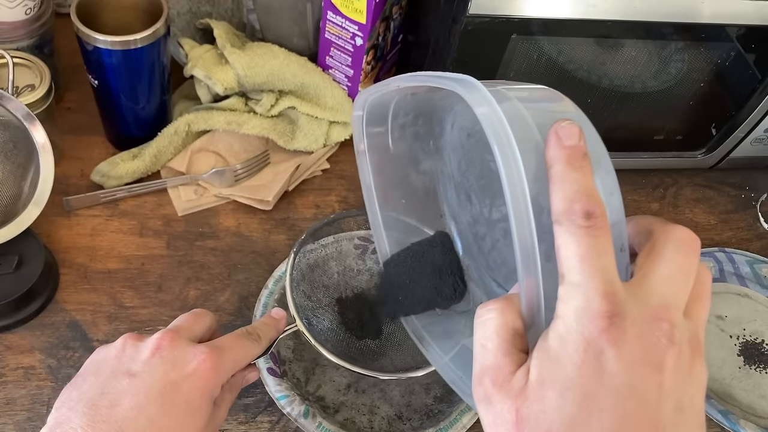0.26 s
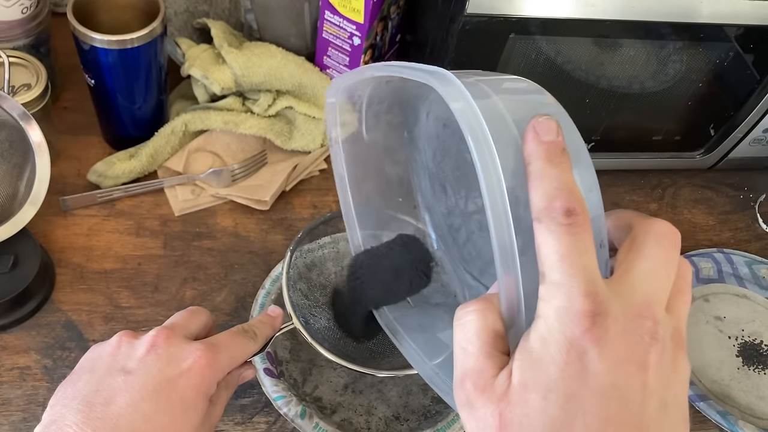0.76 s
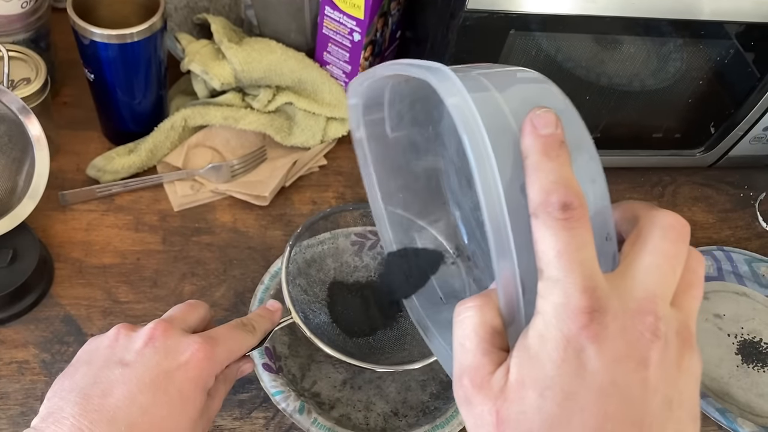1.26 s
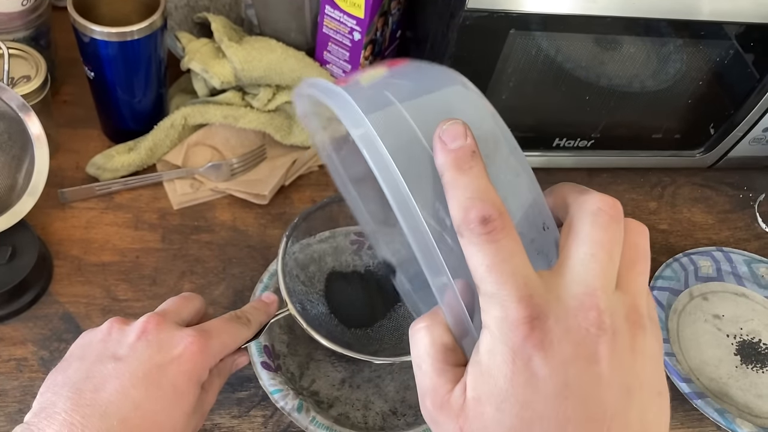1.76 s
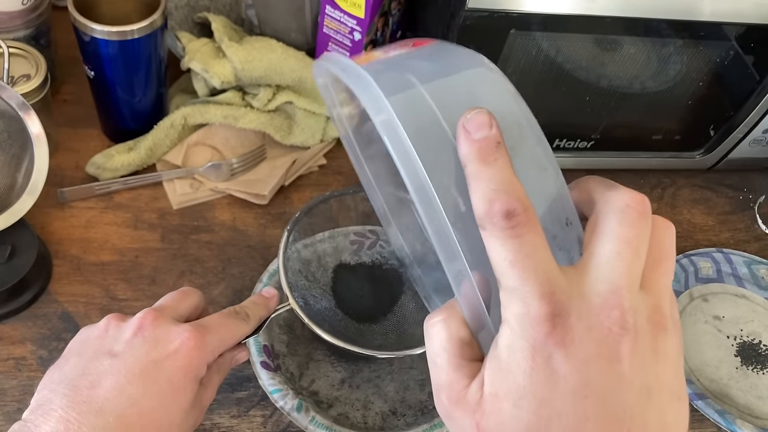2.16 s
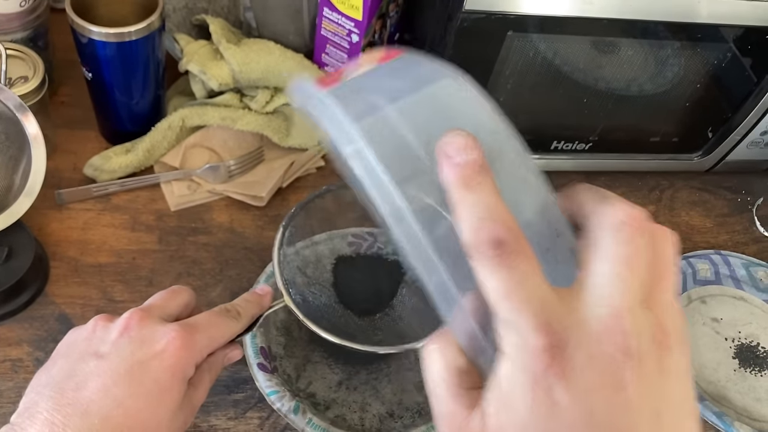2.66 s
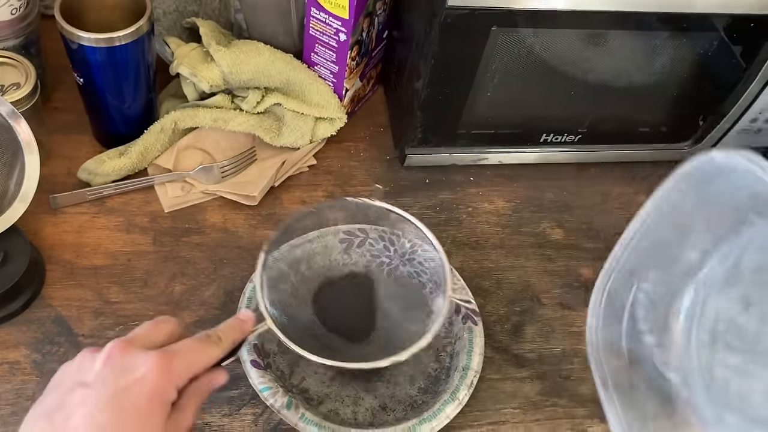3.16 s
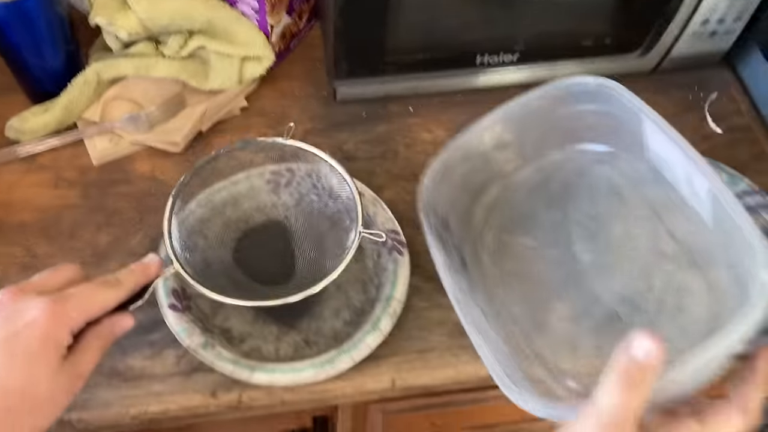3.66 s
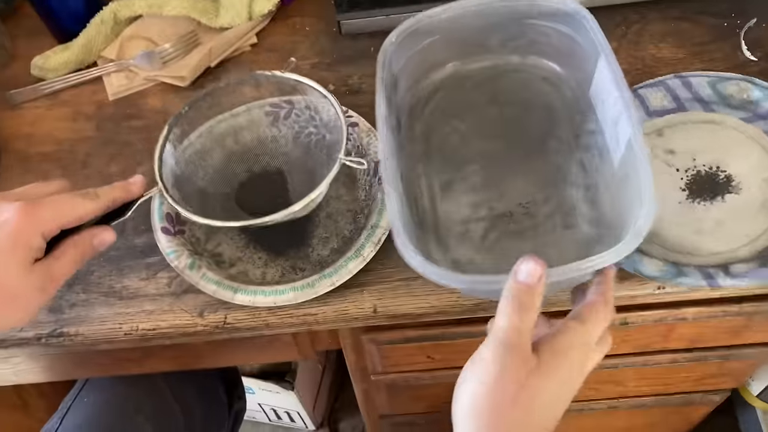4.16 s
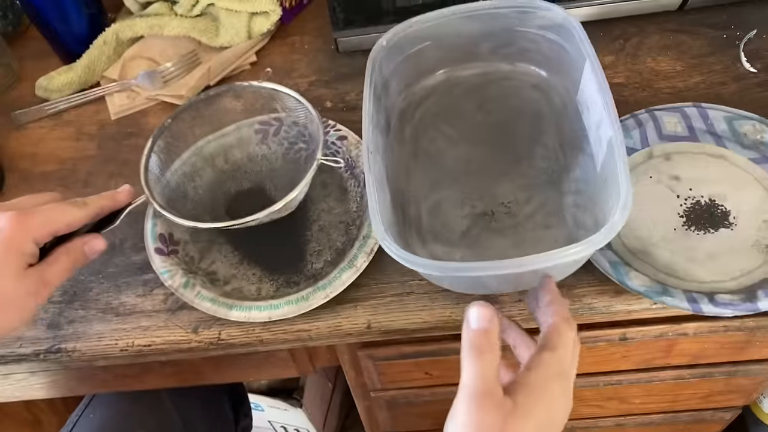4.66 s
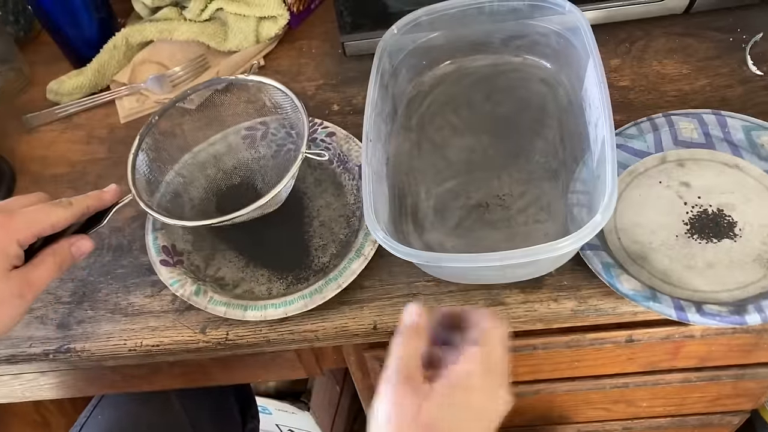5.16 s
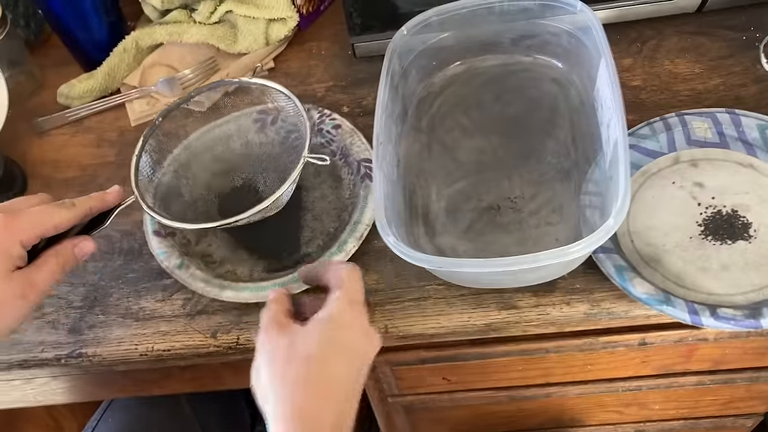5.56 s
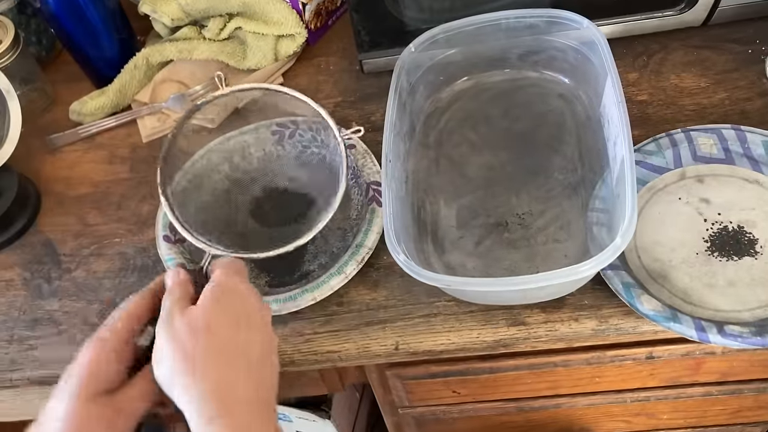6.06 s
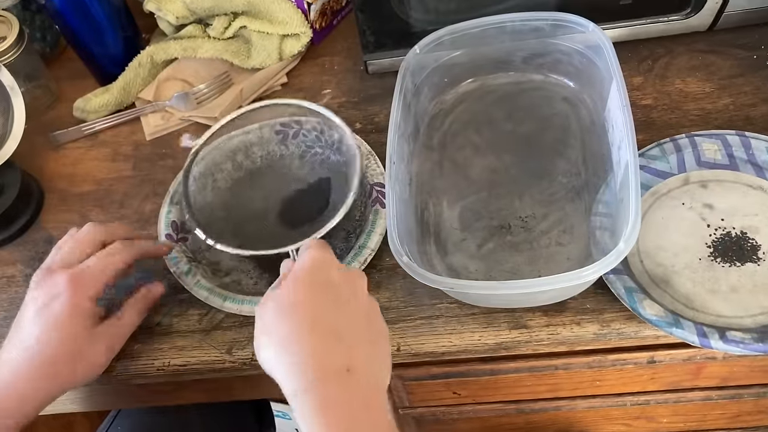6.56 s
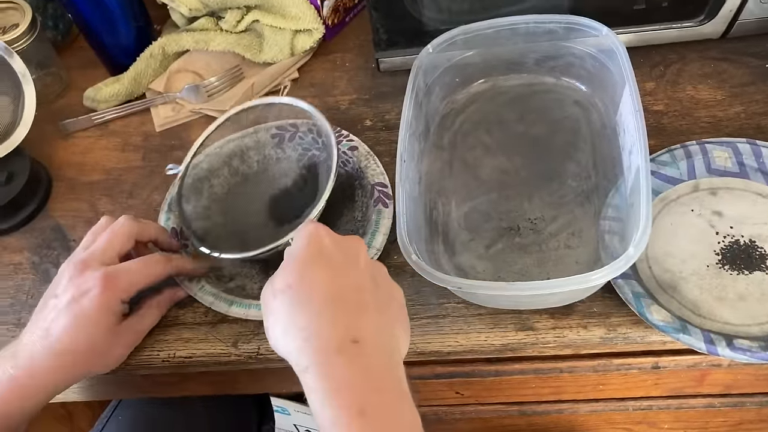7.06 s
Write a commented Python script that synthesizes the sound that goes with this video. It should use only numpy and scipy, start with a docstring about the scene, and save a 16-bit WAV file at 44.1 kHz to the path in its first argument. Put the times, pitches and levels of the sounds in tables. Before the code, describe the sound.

Close up in a small kitchen, fine dry grains slide down a plastic tub and hiss onto wire mesh. Hollow plastic knocks shake out the last grains, then the tub thuds onto a wooden counter and scrapes aside with sharp taps. After a quieter spell, the wire strainer clicks and is shaken in quick, swishing strokes. A distant engine and appliance hum run underneath.

```python
"""Dry grains poured into a wire strainer

Fine grains run from a plastic tub into a wire-mesh strainer on a kitchen counter, close to two microphone ports.
Random tiny impacts make hiss and ticks in the mesh; decaying modes and noise make the tub's knocks, scrapes and taps.
A strainer shake is a row of throws. Outside, an engine changes speed (sine harmonics) beside a fainter drone.
An appliance hums in wavering sines over coloured-noise room air; dense reflections make the small room."""
import sys
import numpy as np
from scipy import signal
from scipy.fft import rfft, irfft
from scipy.io import wavfile
from scipy.ndimage import uniform_filter1d

SR = 44100
rng = np.random.default_rng(int(sys.argv[2]) if len(sys.argv) > 2 else 0)


def bounce(signal):
    """Save signal as a 16-bit WAV file at the path given by the first command-line argument."""
    frames = np.transpose(np.atleast_2d(signal))
    limited = np.clip(frames, -1, 1)
    pcm = np.round(limited * 32767).astype(np.int16)
    wavfile.write(sys.argv[1], SR, pcm)


N = 322371
T = np.arange(N) / SR
HZ = np.fft.rfftfreq(N, 1 / SR)

# Strokes of tub and hands rubbing on the counter. Each row: start in seconds, length in seconds, level in dB.
RUBS = [(3.871, 0.1, -56.5), (4.032, 0.046, -46), (4.103, 0.036, -42.5), (4.155, 0.033, -42.5),
        (4.224, 0.041, -49.5), (4.61, 0.27, -53), (4.67, 0.094, -55.5), (4.775, 0.016, -48.5),
        (4.812, 0.037, -50.5), (5.386, 0.06, -52.5), (5.548, 0.042, -55), (6.138, 0.04, -51),
        (7.049, 0.029, -52)]
RUB_ATTACK_S, RUB_T60_S = 0.0026, 0.065
# Spectrum of rattling grains and snaps on the tub. Each row: frequency in Hz, relative density in dB per Hz.
RATTLE = [(800, -6), (2200, -2.5), (3500, -2.5), (5200, -7.5), (7500, 2.5), (10500, 2), (13000, -6),
          (16000, -11)]


def undb(db):
    """Decibels to gain."""
    return 10 ** (np.asarray(db) / 20)


def unit(x):
    """Scale to rms 1."""
    return x / np.sqrt(np.mean(x ** 2))


def unit_energy(x):
    """Scale to energy 1."""
    return x / np.linalg.norm(x)


def curves(rows):
    """Each column of a table, joined by straight lines in time."""
    s, *columns = np.transpose(rows)
    return [np.interp(T, s, column) for column in columns]


def stroke(rows, fade_s=0.1):
    """Gain of a level curve, faded linearly to silence outside its span."""
    inside_s = np.minimum(T - rows[0][0], rows[-1][0] - T)
    return undb(curves(rows)[0]) * np.clip(1 + inside_s / fade_s, 0, 1)


def walk(rate_hz):
    """Slow random curve, spread near 1: stepped noise smoothed twice."""
    k = int(SR / rate_hz)
    steps = np.repeat(rng.standard_normal(N // k + 1), k)
    return 1.4 * uniform_filter1d(uniform_filter1d(steps, k), k)[:N]


def colour(x, points, size=1024):
    """Minimum-phase filter of unit energy with the given spectrum."""
    hz, db = np.transpose(points)
    grid_hz = np.maximum(np.fft.rfftfreq(size, 1 / SR), 1)
    cepstrum = irfft(np.log(undb(np.interp(np.log(grid_hz), np.log(hz), db))))
    # folding the cepstrum makes the filter causal
    cepstrum[1:size // 2] *= 2
    cepstrum[size // 2 + 1:] = 0
    response = irfft(np.exp(rfft(cepstrum)))
    return signal.oaconvolve(x, unit_energy(response))[:N]


def fade_out(t, t60_s):
    """Exponential decay, 60 dB in t60_s."""
    return np.exp(-np.log(1000) * t / t60_s)


def add(track, s, sound):
    """Mix a sound into a track at s seconds."""
    i = max(int(s * SR), 0)
    track[i:i + len(sound)] += sound[:max(N - i, 0)]


def grains(rate_per_s, spread_db):
    """Random tiny impacts of uneven size and either sign; rms 1."""
    hit = rng.random(N) < rate_per_s / SR
    sign = rng.choice([-1, 1], N)
    size_db = spread_db * np.clip(rng.standard_normal(N), -2.5, 2.5)
    return unit(hit * sign * undb(size_db))


def bursts(times_s, levels_db, hold_s, t60_s, tail_db, tail_t60_s):
    """Envelope of blows: a short held contact, a quick release, then a slower tail."""
    t, envelope = T[:SR // 2], np.zeros(N)
    release = fade_out(np.maximum(t - hold_s, 0), t60_s)
    tail = undb(tail_db) * fade_out(t, tail_t60_s)
    for s, db in zip(times_s, levels_db):
        add(envelope, s, undb(db) * (release + tail))
    blur_s = 0.002  # each side of a landing's edge
    window = np.hanning(max(int(2 * blur_s * SR), 3))
    return signal.oaconvolve(envelope, window / window.sum(), mode="same")


def moves(rows, attack_s, t60_s):
    """Envelope of movements: swell, hold, die away; overlapping ones add in power."""
    t, power = T[:SR], np.zeros(N)
    for s, length_s, db in rows:
        swell = np.minimum(t / attack_s, 1)
        add(power, s, (undb(db) * swell * fade_out(np.maximum(t - length_s, 0), t60_s)) ** 2)
    return np.sqrt(power)


def snaps(rows):
    """Very short noise bursts where two hard things meet."""
    t, out = T[:SR // 50], np.zeros(N)
    for s, db in rows:
        buzz = rng.standard_normal(len(t)) * fade_out(t, 0.0086)
        add(out, s, undb(db) * unit_energy(buzz))
    return out


def strainer(flutter_db=1.5):
    """Grains strike the wires, more of them the faster the heap moves; small and big clumps land among them."""
    # Big clumps thrown against the wire. Each row: start in seconds, level in dB.
    big_clumps = [(.155, -49), (1.204, -43), (1.944, -44), (2.031, -30), (2.128, -36.5), (2.147, -46),
                  (2.174, -36.5), (2.572, -47), (2.754, -40), (2.762, -35.5), (2.902, -38), (2.983, -39),
                  (3.04, -33), (3.048, -31.5), (3.251, -40.5), (3.26, -42), (3.786, -38), (3.808, -35.5),
                  (4.0, -39), (4.13, -31.5), (4.178, -37), (4.262, -37.5), (4.424, -36.5), (4.4476, -35.5),
                  (4.505, -48), (6.029, -44.5), (6.111, -37), (6.143, -36), (6.544, -38), (6.764, -39),
                  (6.912, -36), (7.056, -46), (7.284, -49)]
    # Spectra of hiss and big clumps. Each row: frequency in Hz, relative density in dB per Hz.
    mesh_spectrum = [(600, -0.5), (2000, -7.5), (3700, -4.5), (5200, -7), (7000, -3.5), (9500, 1),
                     (12000, 1), (14000, -6), (16000, -4)]
    tick_spectrum = [(600, 5), (2000, -10), (3500, -4), (5500, -2.5), (7500, 0.5), (10000, 6.5),
                     (13000, 2.5), (16000, -6)]
    clumps_per_s, clump_db, clump_decay_s = 27, 4, 0.0049  # small clumps, level relative to the flow

    flow = heap_flow()
    rain = grains(rate_per_s=5000 * (flow / undb(-52)) ** .6, spread_db=3.8)
    landings = grains(rate_per_s=9000, spread_db=3)
    size_db = clump_db + 1.6 * np.clip(rng.standard_normal(N), -2, 2)
    falls = (rng.random(N) < clumps_per_s / SR) * undb(size_db)
    clump_shape = np.exp(-(T[:SR // 10] / clump_decay_s) ** 2)
    clumps = signal.oaconvolve(falls, clump_shape)[:N] * landings
    flutter = undb(flutter_db * walk(110))
    hiss = flow * (undb(-1.83) * rain * flutter + clumps)
    envelope = bursts(*np.transpose(big_clumps), hold_s=0.0012, t60_s=0.012, tail_db=-29.0, tail_t60_s=0.03)
    return colour(hiss, mesh_spectrum) + colour(envelope * landings, tick_spectrum)


def heap_flow():
    """Grain flow over the mesh: the poured stream, single slips, and a throw at each turn of a shake."""
    # Grains falling from tub to mesh. Each row: time in seconds, level in dB.
    stream = [(0, -47.5), (.5, -50.5), (.68, -55), (.82, -48), (1.11, -52.5), (1.17, -46.5), (1.35, -61.5),
              (1.82, -63)]
    # Heap slips on a jolt or tilt. Each row: start in seconds, length in seconds, level in dB.
    slips = [(1.96, 0.072, -49), (2.125, 0.089, -51), (2.325, 0.11, -51.5), (2.51, 0.052, -50.5),
             (2.745, 0.01, -51), (2.84, 0.071, -50), (2.95, 0.038, -44.5), (3.015, 0.036, -42),
             (3.08, 0.094, -49), (3.225, 0.03, -46.5), (3.305, 0.031, -50), (3.365, 0.026, -49),
             (3.435, 0.021, -44), (3.55, 0.039, -47), (3.635, 0.033, -51.5), (3.735, 0.077, -48),
             (3.84, 0.19, -58), (3.995, 0.07, -46.5), (4.085, 0.15, -47.5), (4.375, .11, -53.5),
             (4.58, 0.077, -49), (4.68, 0.14, -55), (4.82, 0.21, -58), (5.38, 0.081, -48.5),
             (5.55, 0.022, -49), (5.66, 0.88, -65.5), (6.02, 0.11, -57), (6.075, 0.046, -50.5),
             (7.13, 0.074, -52), (7.27, 0.04, -51.5)]
    attack_s, t60_s = 0.0097, 0.24
    trickle_db, trickle_t60_s = -9.5, 1  # stray grains keep falling after every move
    start_s, end_s, period_s = 6.438, 7.1, .148  # shaking to and fro
    shake_db, growth_db_per_s, return_db = -52, 5.5, -4.5  # the way back is weaker
    throw_s, uneven_s, uneven_db = 0.05, 0.003, -0.2

    throws = []
    for k, s in enumerate(np.arange(start_s, end_s, period_s / 2)):
        late, strong = rng.standard_normal(2)
        db = shake_db + growth_db_per_s * (s - start_s) + return_db * (k % 2) + uneven_db * strong
        throws.append((s + uneven_s * late, throw_s, db))
    running = moves(slips + throws, attack_s, t60_s)
    trickle = undb(trickle_db) * moves(slips + throws, attack_s, trickle_t60_s)
    return np.sqrt(running ** 2 + trickle ** 2 + stroke(stream) ** 2)


def frame_clicks():
    """The wire frame snaps against the plate; its rim drags over the dusty glaze."""
    # Single clicks. Each row: start in seconds, level in dB.
    clicks = [(2.904, -16), (3.462, -18), (6.078, -15), (6.195, -29), (6.272, -28), (6.295, -32),
              (6.309, -28), (6.3355, -23), (6.394, -30), (6.462, -11.5), (6.658, -28), (6.881, -24),
              (7.141, -21), (7.283, -22)]
    # Frame spectrum. Each row: frequency in Hz, relative density in dB per Hz.
    wire_spectrum = [(3000, -20), (4900, -1), (6700, -4), (10500, 4), (16000, -1.5)]
    rim_drag = (7, 0.06, -46)  # start s, length s, level dB, as the strainer changes hands
    drag = grains(rate_per_s=2500, spread_db=8) * moves([rim_drag], RUB_ATTACK_S, RUB_T60_S)
    return colour(snaps(clicks) + drag, wire_spectrum)


def tub_knocks(spot_db=2.5):
    """The thin plastic cracks, thuds and rings; the last grains jump and land."""
    # Blows. Each row: start in seconds, body level in dB, crack level in dB, grain rattle level in dB,
    # corner frequency in Hz above which the contact excites modes less.
    knocks = [(1.851, -26.5, -32, -36, 1513), (1.8555, -27, -26, -25, 2200),
              (2.0387, -24, -33.5, -25, 2200), (2.227, -41, -35.5, -37.5, 2500),
              (2.404, -49, -43, -43, 2500), (2.435, -39.5, -40.5, -46, 1199),
              (2.6161, -28.5, -30, -29, 1200), (3.7323, -32.5, -42.5, -52, 980),
              (3.75, -28.5, -47, -59, 330), (4.042, -39, -44, -42, 600)]
    # Modes of the tub at rest. Each row: frequency in Hz, level in dB, T60 in seconds.
    tub_modes = [(188, -5, 0.12), (263.1, -11, 0.06), (325, -10, 0.057), (404.8, 3, 0.12), (532, -5, 0.084),
                 (577, 0, 0.12), (702, -6, 0.084), (847, -8, 0.035), (1030, -7.5, 0.02), (1180, 1, 0.023),
                 (1370, -5, 0.027), (1670, 1.5, 0.023), (2440, 3.5, 0.014)]
    # Spectra of the dense modes of floor and rim, and of the crack.
    # Each row: frequency in Hz, relative density in dB per Hz.
    thud_spectrum = [(120, -22), (230, -5.5), (330, -2.5), (480, -0.5), (640, -6.5), (800, -12),
                     (1100, -15), (1600, -27), (3000, -33), (8000, -58)]
    crack_spectrum = [(120, -12), (300, -3), (600, -5), (1050, 5), (1600, -1.5), (2300, -4), (3500, -5.5),
                      (5000, -8), (12000, -49)]
    flex, flex_s = 0.12, 0.044  # the buckled wall starts this fraction flat and springs back
    contact_s = 0.0036  # tub and rim chatter

    t, body = T[:SR // 2], np.zeros(N)
    hz, db, t60_s = np.transpose(tub_modes)[:, :, None]
    s, body_db, crack_db, rattle_db, contact_hz = np.transpose(knocks)
    chances = rng.standard_normal((len(knocks), 3, len(tub_modes), 1))
    flexed_t = t - flex * flex_s * (1 - np.exp(-t / flex_s))
    build_up = 1 - np.exp(-t * hz / 1.1)  # about a cycle per mode
    for start_s, blow_db, corner_hz, chance in zip(s, body_db, contact_hz, chances):
        detune = 1 + chance[0] / 100  # by the grip
        ring = np.sin(2 * np.pi * (hz * detune * flexed_t + chance[1]))
        softness = 1 / np.hypot(1, (hz / corner_hz) ** 2)
        spot = undb(db + spot_db * np.tanh(chance[2]))  # each spot struck favours other modes
        modes = softness * build_up * spot * fade_out(t, t60_s) * ring
        add(body, start_s, undb(blow_db) * np.sum(modes, axis=0))
    thud = bursts(s, body_db - 9, hold_s=0.0062, t60_s=0.038, tail_db=-4.5, tail_t60_s=0.26)
    thud = thud * rng.standard_normal(N)
    crack = bursts(s, crack_db, hold_s=contact_s, t60_s=0.016, tail_db=-22, tail_t60_s=0.19)
    crack = crack * rng.standard_normal(N)
    rattle = bursts(s, rattle_db, hold_s=contact_s, t60_s=0.011, tail_db=-13.5, tail_t60_s=0.18)
    rattle = rattle * grains(rate_per_s=3500, spread_db=3)
    return body + colour(thud, thud_spectrum) + colour(crack, crack_spectrum) + colour(rattle, RATTLE)


def counter_thud():
    """The wooden top answers dully when the tub is set down; its low modes ring longer and come later."""
    # Modes of the wooden counter. Each row: frequency in Hz, level in dB, T60 in seconds.
    counter_modes = [(118, 1.5, 0.17), (267.5, 3.5, 0.14), (378, 4.5, 0.1), (513, 6.5, 0.042),
                     (630, 1, 0.026), (917, -1.5, 0.034)]
    set_down_s, blow_db = 3.733, -30.5
    bend_s = 0.00925  # slow bending waves: delay of a mode two octaves below the highest

    t, thud = T[:SR // 2], np.zeros(N)
    hz, db, t60_s = np.transpose(counter_modes)[:, :, None]
    modes = undb(blow_db + db) * fade_out(t, t60_s) * np.sin(2 * np.pi * hz * t)
    delays_s = bend_s * (np.sqrt(hz.max() / hz[:, 0]) - 1)
    for delay_s, mode in zip(delays_s, modes):
        add(thud, set_down_s + delay_s, mode)
    return thud


def sliding():
    """The heap slips down the tub wall; plastic and skin catch and slip on the gritty wood."""
    # Grains sliding down the wall. Each row: time in seconds, level in dB.
    pour_levels = [(0, -52.5), (.35, -48.5), (.79, -45), (1.4, -52), (1.8, -50.5)]
    # Spectra of wall and rubbing. Each row: frequency in Hz, relative density in dB per Hz.
    wall_spectrum = [(150, -4.5), (290, 2), (420, -2.5), (550, 2.5), (720, 1), (880, -5.5), (1150, -13),
                     (1800, -21), (5000, -51)]
    rub_spectrum = [(200, -30), (500, 1), (800, 7.5), (1120, 3), (1500, 2.5), (2250, 5.5), (3200, -4),
                    (5000, -1.5), (8000, -9), (13000, -20)]
    grit_db, catch_db = -1, -5  # relative to the stroke

    pour = grains(rate_per_s=1800, spread_db=1.5) * stroke(pour_levels, fade_s=1.0) * undb(0.67 * walk(25.8))
    grit = unit(grains(rate_per_s=900, spread_db=4.5) * undb(5.1 * walk(140)))
    grit = grit * moves(RUBS, RUB_ATTACK_S, RUB_T60_S)
    return colour(pour, wall_spectrum) + undb(grit_db) * colour(grit, rub_spectrum) + undb(catch_db) * catches()


def catches():
    """Stick and slip: uneven little jerks ring the tub."""
    out = np.zeros(N)
    gap_s = 0.007  # median time between catches
    for rub in RUBS:
        gap, force = rng.standard_normal((2, SR // 100))
        at = ((rub[0] + np.cumsum(gap_s * np.exp(.35 * gap))) * SR).astype(int)
        jerks = np.bincount(at, undb(4.2 * np.tanh(force)), N)[:N] * np.sqrt(gap_s * SR)
        jerks = jerks * moves([rub], RUB_ATTACK_S, RUB_T60_S)
        out += signal.oaconvolve(jerks, scrape_ring())[:N]
    return out


def scrape_ring(grip=0.019):
    """One ring of the tub's foot, of unit energy, with modes randomly detuned by the fraction grip."""
    # Resonances of the tub dragged over wood. Each row: frequency in Hz, level in dB, T60 in seconds.
    scrape_modes = [(1107, 2, 0.05), (1370, 1, .02), (1583, 0.5, 0.035), (1806, 0, 0.024),
                    (2120, 2.5, 0.022), (2300, 2.5, 0.023), (2760, 3.5, 0.017), (3300, -1.5, 0.017),
                    (3900, -2, 0.01)]
    t = T[:SR // 10]
    hz, db, t60_s = np.transpose(scrape_modes)[:, :, None]
    detune, phase = rng.standard_normal((2, len(scrape_modes), 1))
    tones = np.sin(2 * np.pi * (hz * (1 + grip * detune) * t + phase))
    return unit_energy(np.sum(undb(db) * fade_out(t, t60_s) * tones, axis=0))


def tub_taps():
    """Single taps and a quick run of jumps: each is a snap and a short ring of the plastic."""
    # Tub foot on wood, fingernails on the wall. Each row: start in seconds, ring level in dB, snap level in dB.
    single_taps = [(4.0275, -11, -19), (4.753, -26, -23), (4.774, -16, -16), (4.972, -25, -17.5)]
    start_s, end_s, gap_s = 4.104, 4.143, .0092  # the tub judders as it is pushed aside
    judder_db, judder_snap_db = -13.5, -20
    taps = single_taps + [(s, judder_db, judder_snap_db) for s in np.arange(start_s, end_s, gap_s)]
    out = colour(snaps([(s, snap_db) for s, _, snap_db in taps]), RATTLE)
    for s, ring_db, _ in taps:
        add(out, s, undb(ring_db) * scrape_ring())
    return out


def engine():
    """Through the walls only the firing tone and a few harmonics are left; these come and go and waver."""
    # Firing tone. Each row: time in seconds, firing rate in Hz, level in dB.
    firing = [(0, 97.1, -38), (.45, 104.5, -41.5), (.88, 100.4, -35.5), (1.03, 86.7, -38.5),
              (1.15, 76.8, -25), (1.6, 76.46, -28.5), (2.65, 72.96, -31), (3.2, 74.1, -44.5),
              (3.5, 69.4, -41), (3.95, 64.77, -43), (4.15, 76.9, -37), (4.3, 82.8, -39),
              (4.52, 81.4, -33.5), (4.75, 85, -40), (5.55, 85.4, -39.5), (6.2, 87.9, -34),
              (6.48, 91.85, -34), (7.31, 95.7, -35)]
    # Second, third and fourth harmonics. Each row: time in seconds, level in dB.
    second = [(0, -70), (1.0, -58), (1.35, -46.5), (2, -54.5), (3.2, -60.5), (4.05, -54), (4.3, -43),
              (5.0, -43), (5.12, -51.5), (6.2, -47), (6.5, -65)]
    third = [(5.6, -68), (5.85, -56), (6.25, -60.5), (6.5, -48), (6.8, -50), (6.9, -58.5), (7.05, -53),
             (7.31, -58)]
    fourth = [(4.5, -69), (5.15, -55), (5.35, -64.5), (6.2, -64.5), (6.6, -55.5), (6.85, -60), (6.951, -84)]

    hz, db = curves(firing)
    phase = 2 * np.pi * np.cumsum(hz * (1 + .002 * walk(14))) / SR
    out = undb(db + .4 * walk(12)) * np.sin(phase)
    for k, levels in enumerate([second, third, fourth], 2):
        gain = undb(curves(levels)[0] + .8 * walk(7))
        out = out + gain * np.sin(k * phase + .1 * walk(8))
    return np.sqrt(2) * out


def far_drone():
    """A second, fainter low tone that comes and goes and drifts in pitch."""
    # Each row: time in seconds, frequency in Hz, level in dB.
    drone = [(0, 123, -51), (.75, 130, -44), (1.3, 127, -55), (5.0, 120, -62), (5.8, 128, -47),
             (6.2, 138, -53), (6.5, 140, -68)]
    hz, db = curves(drone)
    return np.sqrt(2) * undb(db + walk(8)) * np.sin(2 * np.pi * np.cumsum(hz) / SR)


def appliance(drift_rad_per_db=0.463):
    """Motor and mains lines and a faint whine; most waver slightly, the 62.75 Hz line strongly."""
    # Each row: frequency in Hz, level in dB, waver in dB.
    hum_lines = [(59, -42.5, 2), (62.75, -48.5, 12), (119.2, -58, -1), (2200, -79, 1), (2343, -73.5, 2.5),
                 (3830, -81, 1.5)]
    out = np.zeros(N)
    for hz, db, waver_db in hum_lines:
        gain = undb(db + waver_db * np.tanh(walk(4.1)))
        out += gain * np.sin(2 * np.pi * hz * T + drift_rad_per_db * waver_db * walk(5))
    return np.sqrt(2) * out


def room_tone():
    """Steady air that swells a little."""
    # Air spectrum. Each row: frequency in Hz, relative density in dB per Hz.
    air_spectrum = [(20, -12), (35, -10.5), (55, 2), (90, -1), (130, -3.5), (200, -11), (270, -11),
                    (450, -21), (750, -23), (1500, -32), (2350, -32.5), (2900, -40), (3400, -40.5),
                    (3850, -37), (4500, -42), (6500, -49), (15000, -55)]
    # Each row: time in seconds, level in dB.
    air_levels = [(0, -43), (4.5, -42), (6.5, -45.5)]
    mid, side = (unit(colour(rng.standard_normal(N), air_spectrum, size=8192)) for _ in range(2))
    swell_db = .8 * walk(6)
    return undb(curves(air_levels)[0] + swell_db) * diffuse(mid, side)


def kitchen(x):
    """Dense short reflections from counter, cupboards and walls, duller than the direct sound."""
    t = T[:SR // 2]
    tails = rng.standard_normal((2, len(t))) * fade_out(t, 0.31) * (t > .003)
    dull = colour(x, [(200, 0), (1000, 0), (4000, -1), (8000, -7), (15000, -8)])
    mid, side = (signal.oaconvolve(dull, unit_energy(tail))[:N] for tail in tails)
    return diffuse(mid, side)


def diffuse(mid, side, wide_hz=600):
    """Sound from all around: the bass is much alike at both ports, the treble unrelated."""
    side = irfft(rfft(side) * np.clip(HZ / wide_hz, .35, 1), N)
    return mid + np.array([[1], [-1]]) * side


def at_ports(x, ripple_hz=380):
    """A near sound reaches the two ports at different times; the counter top scatters its phase."""
    # Left port's phase lead over the right. Each row: frequency in Hz, lead in radians, scatter in radians.
    port_phase = [(0, 0, 0), (300, 0, .3), (600, .3, .7), (1500, 1.1, .8), (4000, 1.4, .8), (4900, 2.0, .7),
                  (7000, -.1, .3), (22000, -20.85, .2)]
    hz, lead, scatter = np.transpose(port_phase)
    knots_hz = np.arange(0, SR / 2 + ripple_hz, ripple_hz)
    ripple = np.interp(HZ, knots_hz, rng.standard_normal(len(knots_hz)))
    phase = np.interp(HZ, hz, lead) + np.interp(HZ, hz, scatter) * ripple
    turn = np.exp(.5j * phase)  # half the lead each way
    return irfft(rfft(x) * np.array([turn, turn.conj()]), N)


def scene(engine_pan_db=-3.0, appliance_pan_db=-6.0, air_pan_db=-1.0):
    """Strainer and tub close by, the kitchen around them; drones, hum and air are stronger on the right."""
    near = [strainer() + frame_clicks(), tub_knocks() + counter_thud(), sliding() + tub_taps()]
    out = undb(-11) * kitchen(sum(near))
    for x in near:
        out = out + at_ports(x)
    far = [(engine() + far_drone(), engine_pan_db), (appliance(), appliance_pan_db), (room_tone(), air_pan_db)]
    for x, left_over_right_db in far:
        out = out + x * undb(np.array([[left_over_right_db], [-left_over_right_db]]) / 2)
    return out


def record(dry):
    """A steep elliptic lowpass cuts the top."""
    top_hz = 15900
    return signal.sosfilt(signal.ellip(10, .2, 70, top_hz, fs=SR, output="sos"), dry)


dry = scene()
out = record(dry)
bounce(out)
```